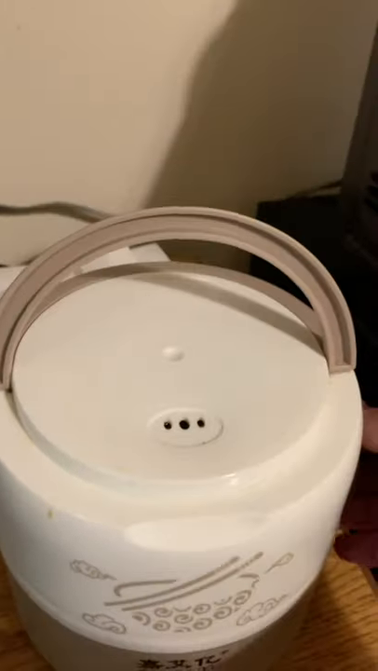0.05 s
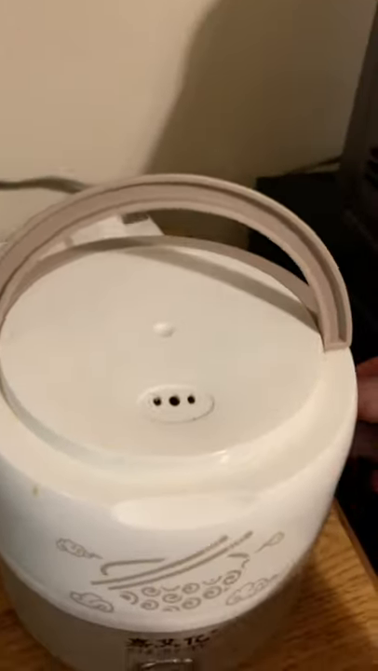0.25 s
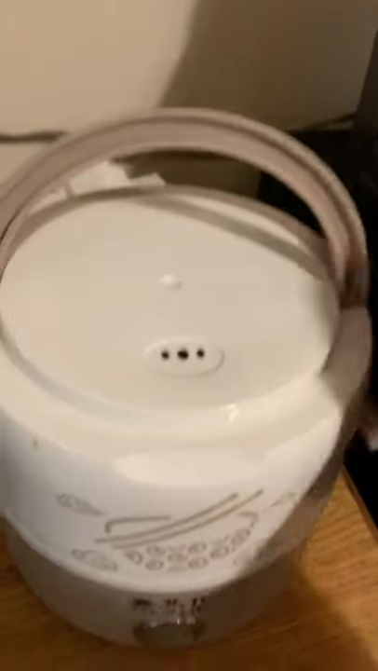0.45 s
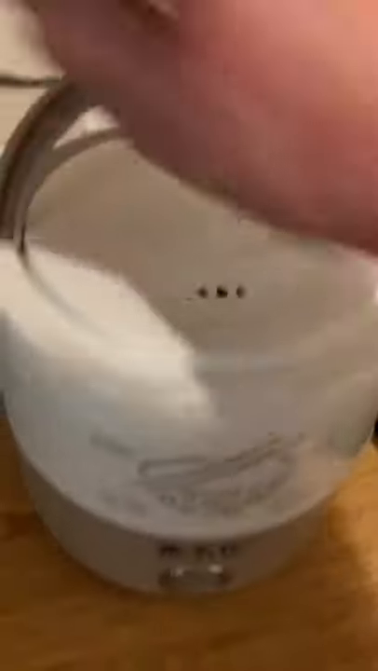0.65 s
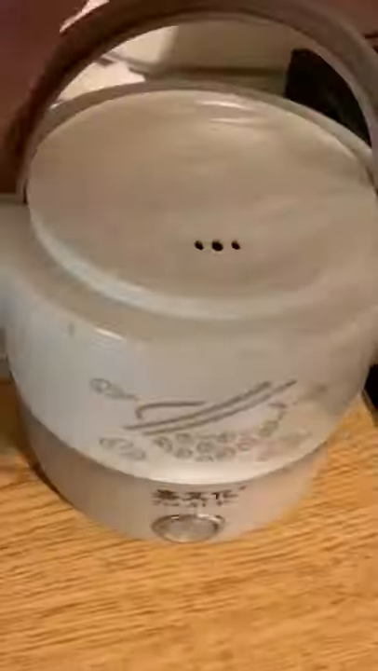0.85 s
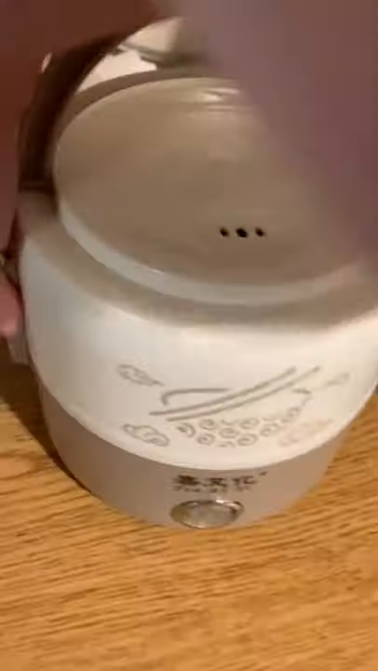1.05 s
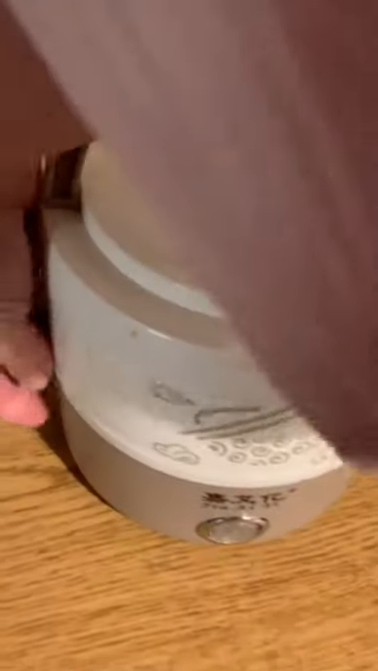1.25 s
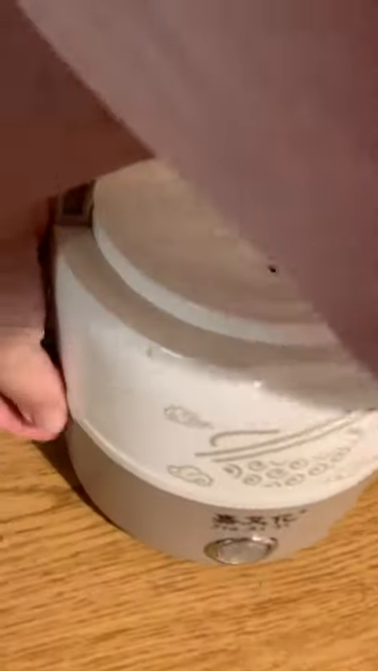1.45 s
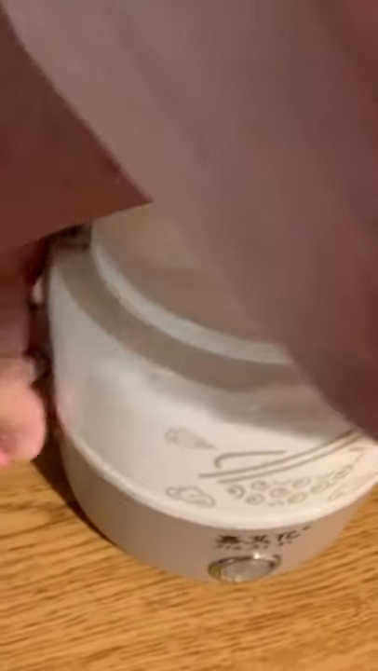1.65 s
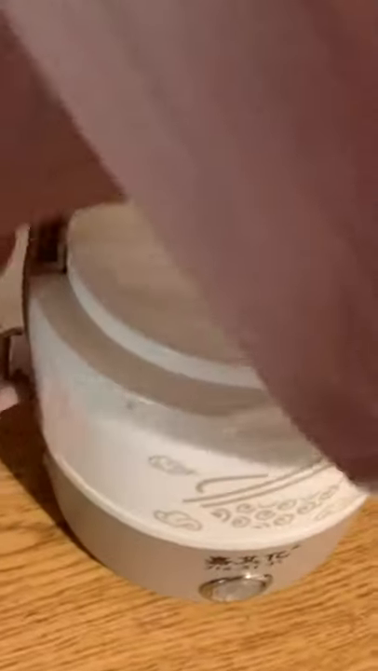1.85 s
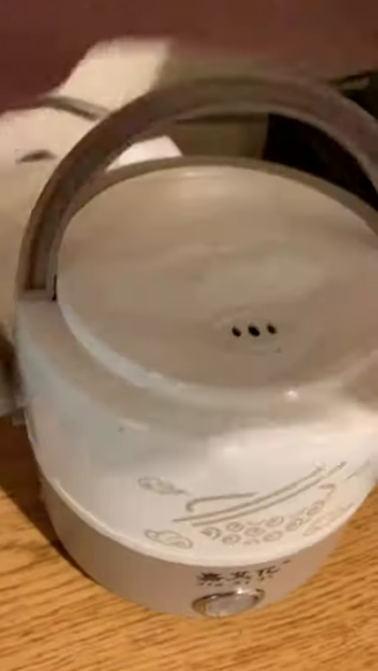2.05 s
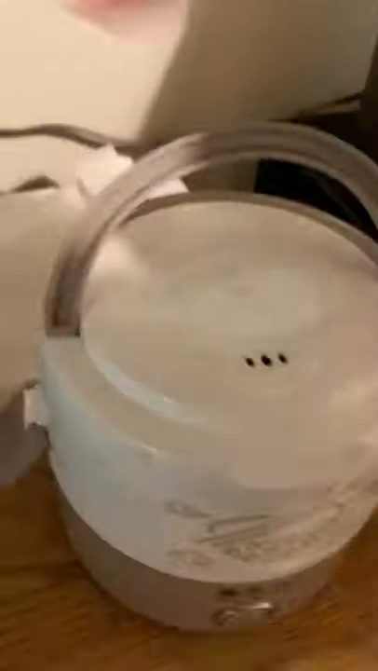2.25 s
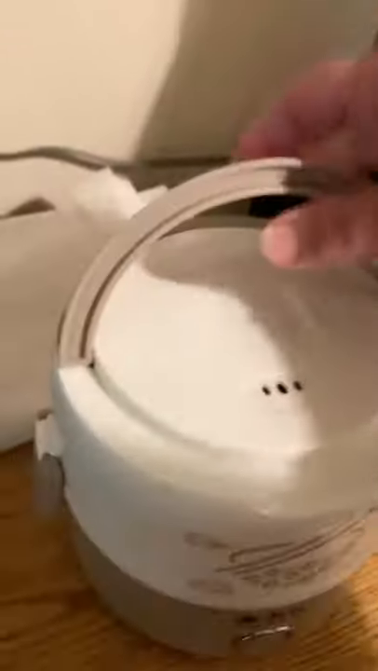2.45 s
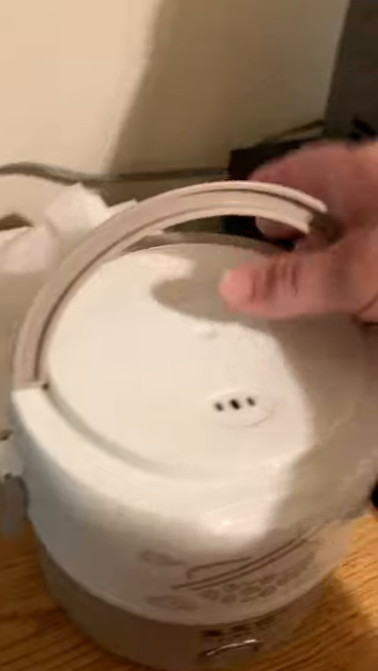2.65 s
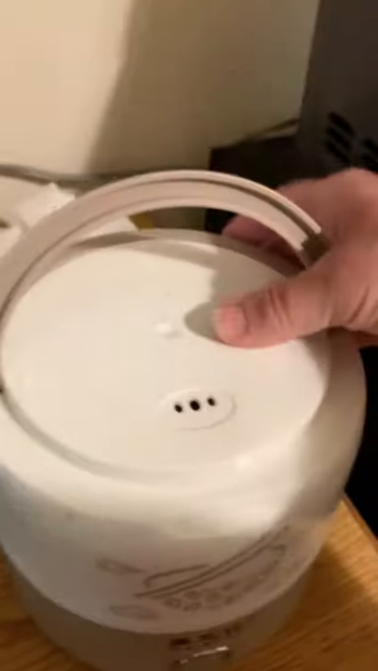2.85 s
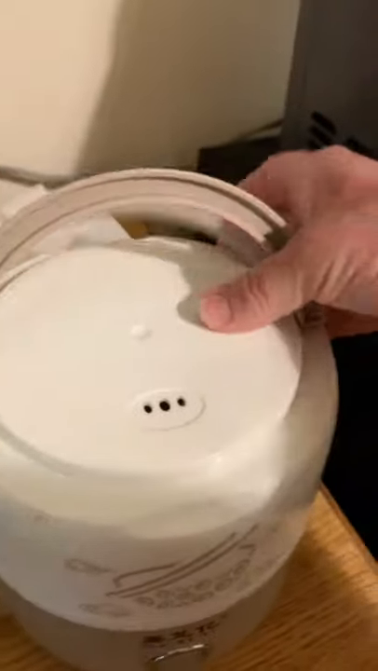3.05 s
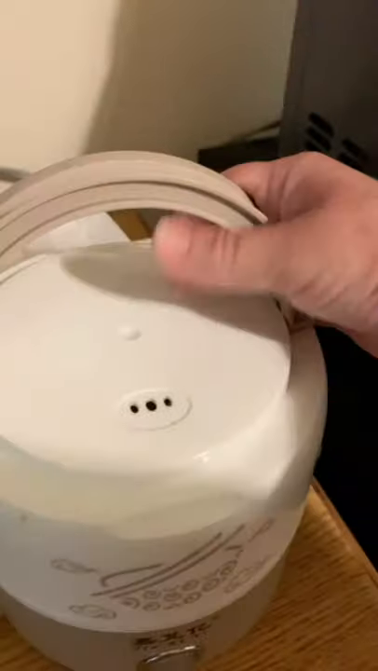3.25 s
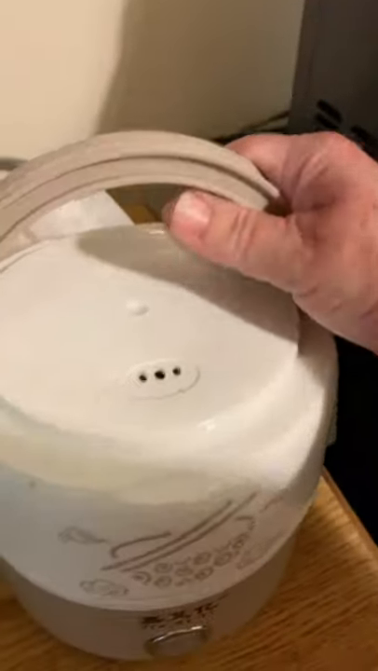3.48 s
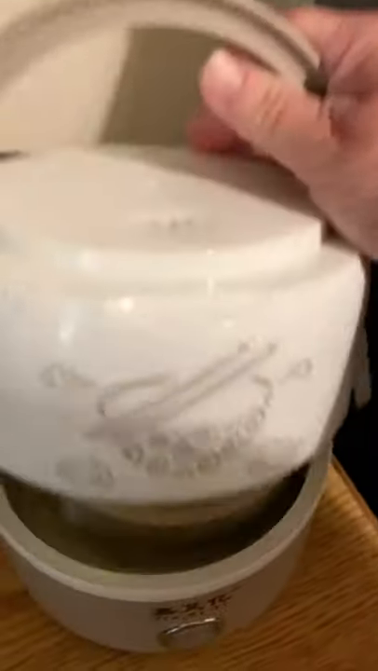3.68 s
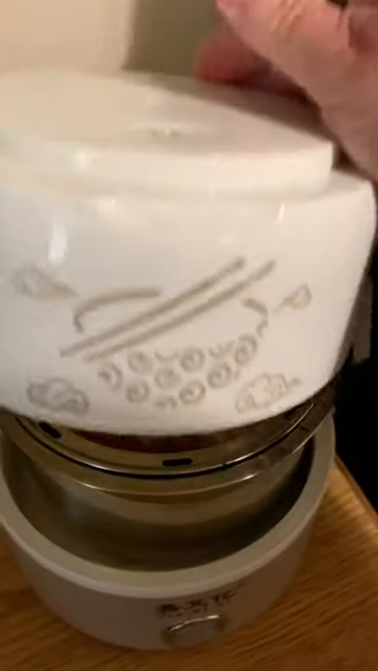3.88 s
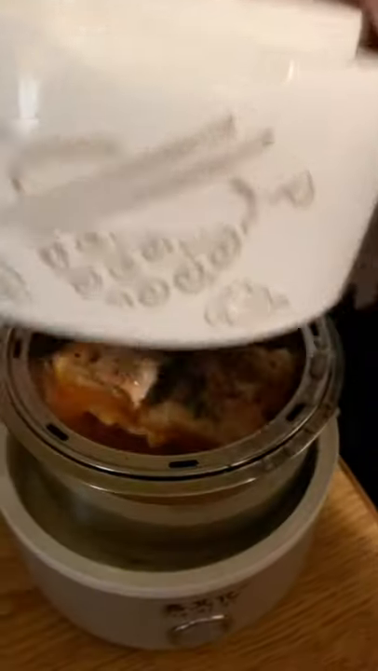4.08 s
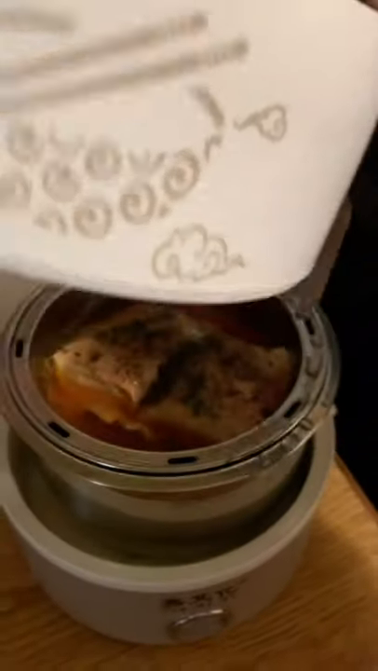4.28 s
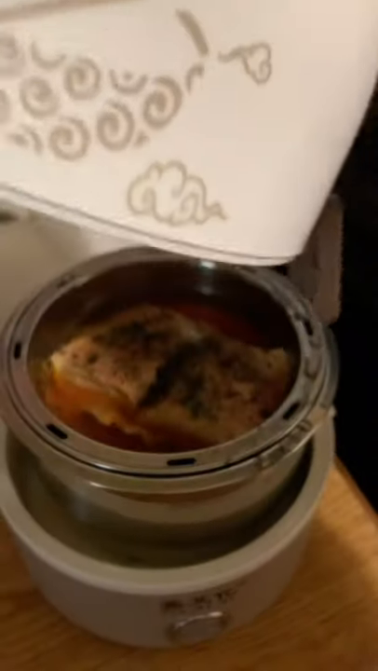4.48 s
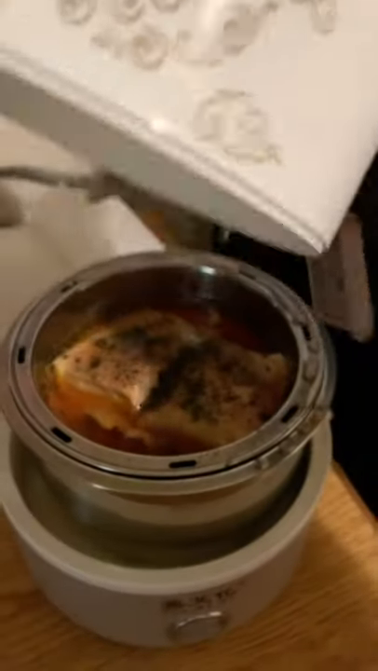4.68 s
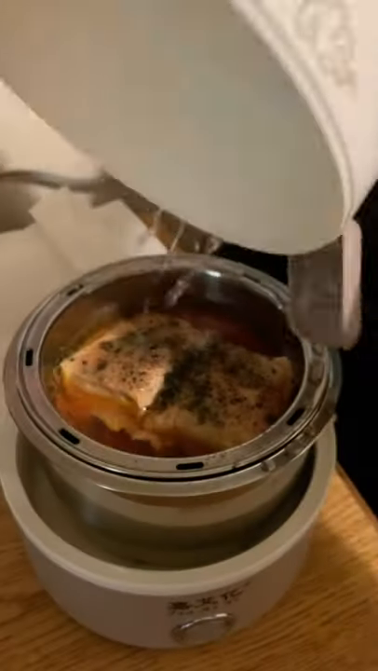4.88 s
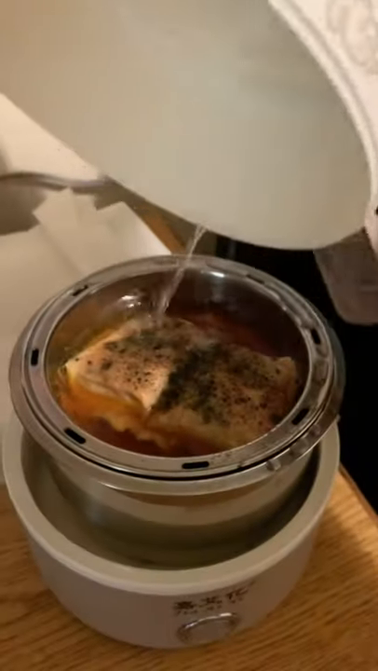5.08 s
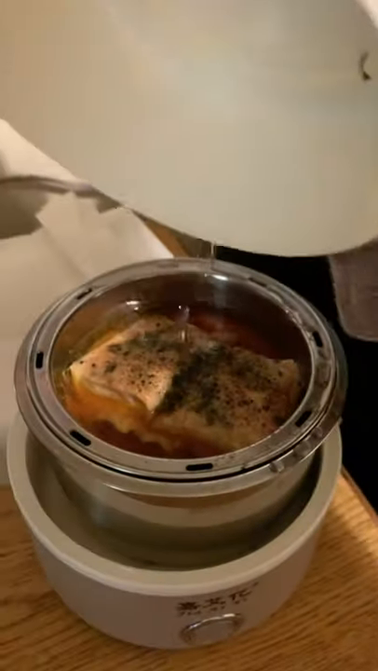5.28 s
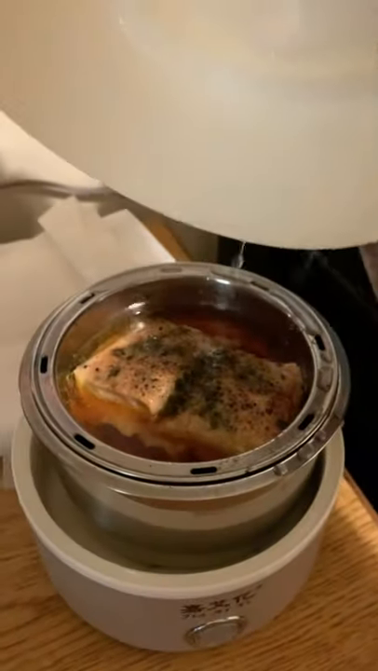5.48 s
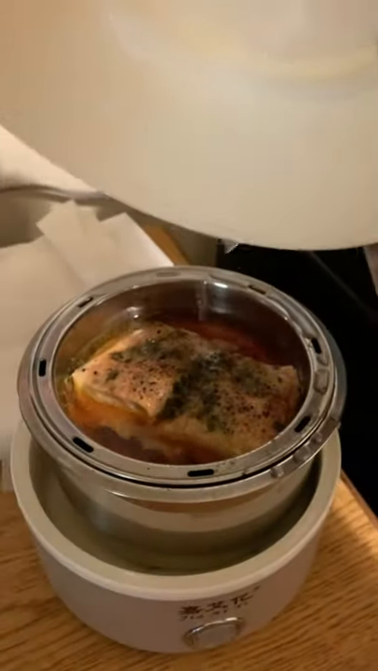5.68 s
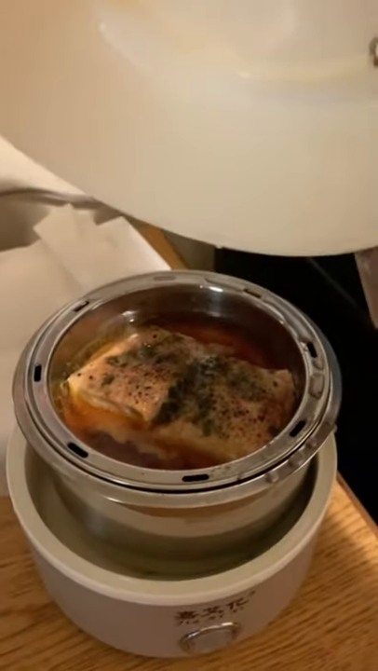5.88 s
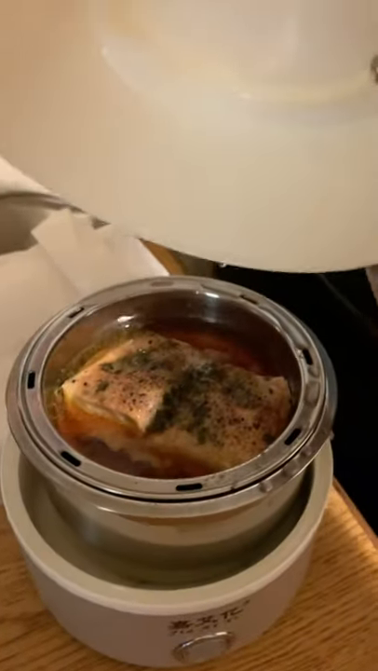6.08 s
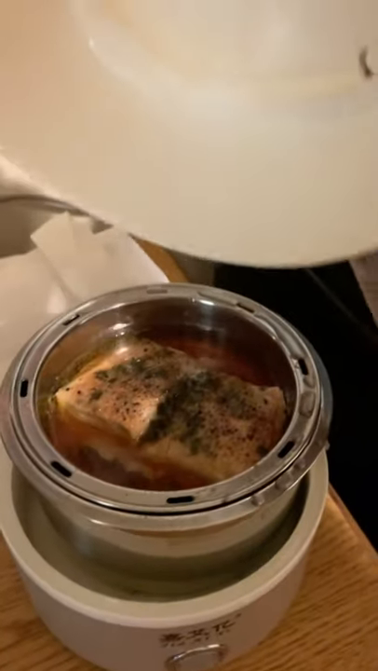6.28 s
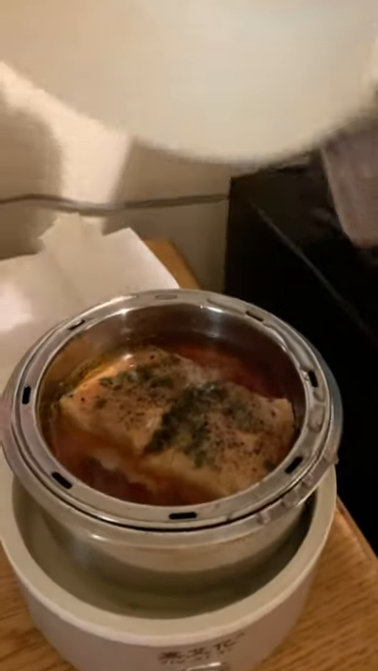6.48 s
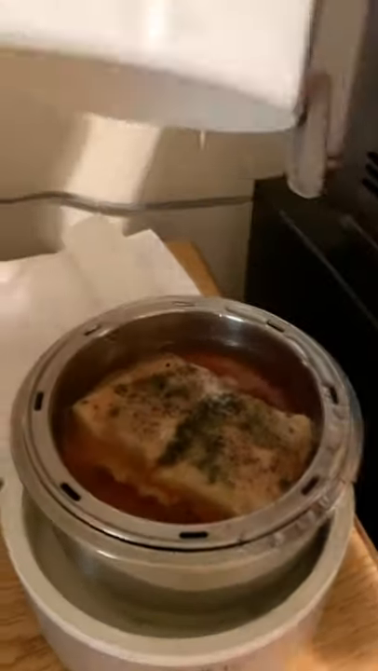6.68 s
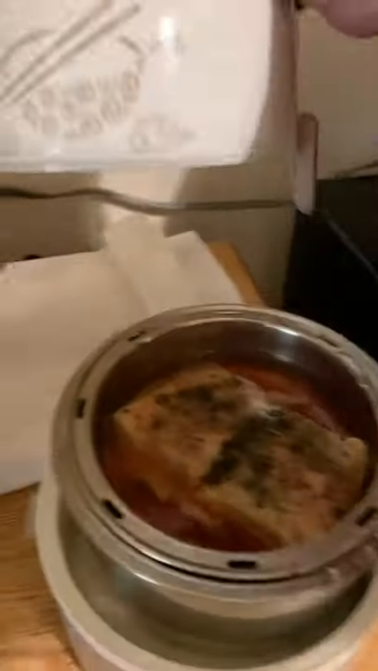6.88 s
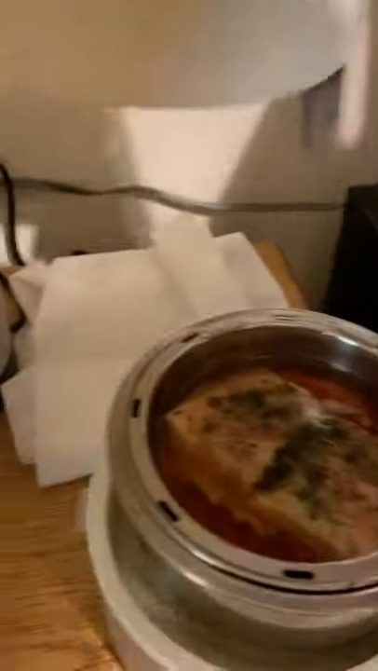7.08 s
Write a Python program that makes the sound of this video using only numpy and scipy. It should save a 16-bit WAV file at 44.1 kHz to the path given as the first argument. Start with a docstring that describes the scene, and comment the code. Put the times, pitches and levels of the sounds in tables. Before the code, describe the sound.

Close, dry clicks and knocks of a plastic container being unlatched, a brief rough scrape against steel, then irregular water drops pattering beside it.

```python
"""An electric lunch box is opened on a wooden desk in a small room, close to the microphone.
Handle, latches, cover and pot are struck or rubbed resonances; latches snap, the cover scrapes up off the pot.
Condensed water spatters beside it: each drop strikes modes, rings bubbles and makes a hollow hum.
Shaped noise gives the pot's steam, the brushing sleeve, the low rumble and the room air."""
import sys
import numpy as np
from scipy import signal
from scipy.fft import rfft, irfft
from scipy.io import wavfile
from scipy.ndimage import uniform_filter1d

SR = 44100
rng = np.random.default_rng(int(sys.argv[2]) if len(sys.argv) > 2 else 0)


def store_wav(level_fs):
    """Save 16-bit WAV to argv[1]."""
    pcm = np.round(np.clip(np.atleast_2d(level_fs), -1, 1) * 32767)
    wavfile.write(sys.argv[1], SR, pcm.T.astype(np.int16))


N = 314433


def amp(db):
    """Decibels to gain."""
    return 10 ** (np.asarray(db) / 20)


def evened(x):
    """Scales to rms 1."""
    return x / np.sqrt(np.mean(x ** 2) + 1e-20)


def read(points, hz):
    """Interpolates a table along a log-frequency axis."""
    f, value = np.transpose(points)
    return np.interp(np.log(hz + 1), np.log(f + 1), value)


def add(mix, s, sound):
    """Mixes a sound in at time s."""
    part = mix[max(round(s * SR), 0):][:len(sound)]
    part += sound[:len(part)]


def body(modes, hz, loss):
    """Response of resonances of alternating sign; loss widens each in proportion to its pitch."""
    total = 0
    for k, (f, width_hz, db) in enumerate(modes):
        damping = 1j * hz * (width_hz + loss * f)
        total = total + (-1) ** k * amp(db) * damping / (f * f - hz * hz + damping)
    return total


def bending(hz, lag_s):
    """Bending waves in a thin shell: treble arrives first, bass late (about lag_s at 1 kHz)."""
    delay_s = lag_s * (1000 / (hz + 60)) ** 0.774
    return np.exp(-2j * np.pi * np.cumsum(delay_s) * hz[1])


def swells(rows, swell_db=20):
    """Gain of efforts that build by swell_db in rise_s and lose it again in fall_s."""
    t = np.arange(N) / SR
    gain = np.zeros(N)
    for peak_s, db, rise_s, fall_s in rows:
        distance = np.maximum((peak_s - t) / rise_s, (t - peak_s) / fall_s)
        gain += amp(db - swell_db * distance)
    return gain


def scattered(spells, count, spread_db):
    """Small events strewn unevenly through each spell, count to a spell: start_s, level_db."""
    events = []
    for start_s, end_s, db in spells:
        for k, (late, size) in enumerate(rng.random((count, 2))):
            s = start_s + (end_s - start_s) * (k + late) / count
            events.append((s, db + spread_db * (size - .5)))
    return events


# diffuse sound at the two ports: hz, likeness (-1 to 1)
LIKENESS = [(60, 0.96), (130, 0.93), (290, 0.86), (640, 0.21), (1410, 0.71), (3100, -0.54), (6820, 0.68),
            (15000, -0.42)]
# close sound, right port behind left: hz, lag_rad
PORT_PHASE = [(0, -0.5), (1100, 0.6), (2000, 1.13), (3500, 1.63), (5000, 3.5), (6500, 5), (8000, 7.5),
              (9800, 9), (11800, 14), (16000, 12.5)]


def noise(colour, patchy_db, direct=0):
    """Two-channel coloured noise with drifting patches; share direct comes from close by, the rest is diffuse."""
    hz = np.fft.rfftfreq(2048, 1 / SR)
    a, b, c, d, patches = rng.standard_normal((5, N // 512 + 5, len(hz))).transpose(0, 2, 1)
    patches = uniform_filter1d(patches, size=20, axis=0)
    patches = evened(uniform_filter1d(patches, size=6, axis=1))
    direct = np.clip(direct, 0, 1)
    diffuse_same = np.clip(read(LIKENESS, hz), -1, 1)
    direct_same = np.exp(-1j * read(PORT_PHASE, hz))
    same = ((1 - direct) * diffuse_same + direct * direct_same)[:, None]
    left = a + 1j * b
    right = same * left + np.sqrt(abs(1 - abs(same) ** 2)) * (c + 1j * d)
    z = np.array([left, right]) * amp(read(colour, hz)[:, None] + patchy_db * patches)
    return evened(signal.istft(z, nperseg=2048, noverlap=1536)[1][:, :N])


# spectrum shape: hz, relative_db_per_hz
ROOM_AIR = [(150, -52), (250, -12), (698, -7), (1580, -23), (2620, -26.5), (8260, -36), (9830, -76),
            (10700, -33), (12100, -38), (16000, -57)]


def room_air():
    """Steady diffuse noise of the room."""
    return amp(-58.0) * noise(ROOM_AIR, patchy_db=3.5)


# spectrum shape: hz, relative_db_per_hz
RUMBLE_COLOUR = [(15, -38), (25, -16.5), (65, 1), (97, -13.5), (123, 3), (152, -12.5), (179, -5),
                 (224, -13), (248, -6), (335, -9), (370, -18), (394, -17), (500, -20.5), (650, -49),
                 (1100, -120)]


def low_rumble():
    """Low diffuse noise of handling and of the room."""
    return amp(-49) * noise(RUMBLE_COLOUR, patchy_db=2.5)


# close sound into the microphone: hz, level_db
MIC = [(100, 2.5), (1000, -2.5), (3000, -2.5), (5000, 9), (7500, 0.5), (8700, 0), (9900, -10.5),
       (11500, -6.5), (13300, -9.5), (15500, -37)]


def microphone_spectrum(x):
    """Spectrum of x with the microphone's colour."""
    return rfft(x) * amp(read(MIC, np.fft.rfftfreq(N, 1 / SR)))


def ports(x, balance):
    """A close source reaches the two microphone ports with different delay and level."""
    hz = np.fft.rfftfreq(N, 1 / SR)
    z = microphone_spectrum(x)
    side = amp(read(balance, hz) / 2)
    return irfft(np.array([z * side, z / side * np.exp(-1j * read(PORT_PHASE, hz))]), N)


def all_around(x, evening):
    """A shell beams each mode its own way, so its total radiation has a smoother spectrum (evening 0-1)."""
    z = rfft(x)
    fine_db = 10 * np.log10(abs(uniform_filter1d(abs(z) ** 2, size=250)) + 1e-12)
    peaks_db = fine_db - uniform_filter1d(fine_db, size=9000)
    return irfft(z * amp(-np.clip(evening, 0, 1) * peaks_db), N)


# decay per band: hz, t60_s
ROOM_T60 = [(120, 1.5), (400, 0.5), (1500, 0.36), (4000, 0.53), (8000, 0.37), (14000, 0.36)]
# echo spectrum shape: hz, relative_db
ROOM_COLOUR = [(100, 7), (300, 7.5), (1000, 10.5), (3000, 5), (7000, -4.5), (13000, 10.5)]


def room(x, gap_s):
    """Dense reflections from desk and walls; each band dies at its own speed, the bass nearly alike on both sides."""
    taps = rng.standard_normal((2, SR // 2)) * (rng.random((2, SR // 2)) < .1)
    hz, t, z = signal.stft(taps, SR, nperseg=256)
    same = np.clip(read(LIKENESS, hz), -1, 1)[:, None]
    z = np.array([z[0], same * z[0] + np.sqrt(1 - same ** 2) * z[1]])
    z = z * amp(-60 * t / read(ROOM_T60, hz)[:, None])
    tail = signal.istft(z * amp(read(ROOM_COLOUR, hz))[:, None], SR, nperseg=256)[1]
    # silent for gap_s, then faded in over gap_s
    tail = tail * np.clip(np.arange(tail.shape[1]) / SR / gap_s - 1, 0, 1)
    heard = irfft(microphone_spectrum(x), N)
    return signal.fftconvolve(heard[None], tail / np.linalg.norm(tail[0]), axes=1)[:, :N]


# spectrum shape: hz, relative_db_per_hz
STEAM_COLOUR = [(290, -40), (500, -4), (1020, -21), (1190, -1), (1300, -8.5), (1870, 1.5), (2570, -6.5),
                (3250, -20), (4090, -5.5), (6510, -3.5), (8830, -19.5), (9360, -65), (10800, -20),
                (13300, -19.5), (16000, -68)]
STEAM_START_S, STEAM_RISE_S, STEAM_DB, STEAM_FADE_DB_PER_S = 3.55, 0.016, -54.5, 2.5


def steam_hiss():
    """Steam freed as the cover lifts: noise with a quick rise, then a steady fade."""
    age_s = np.maximum(np.arange(N) / SR - STEAM_START_S, 0)
    gain = np.minimum(age_s / STEAM_RISE_S, 1) * amp(STEAM_DB - STEAM_FADE_DB_PER_S * age_s)
    return gain * noise(STEAM_COLOUR, patchy_db=2.0, direct=0.81)


def strokes(rows, edge_db=16.5):
    """Gain of smooth strokes, loudest in the middle and edge_db softer at the ends."""
    t = np.arange(N) / SR
    return sum(amp(db - edge_db * (2 * (t - s) / length_s) ** 2) for s, length_s, db in rows)


# sleeve and hand strokes: middle_s, length_s, level_db, fizz_db (re level)
BRUSH = [(0.148, 0.081, -59.5, -4), (0.3, 0.1, -68.5, -2), (0.983, .13, -60.5, 5), (1.178, 0.21, -65.5, 2),
         (1.273, 0.24, -61.5, -4.5), (1.508, 0.18, -62.5, -1), (2.502, 0.12, -73, 8),
         (2.695, 0.12, -53, -8.5), (2.86, 0.15, -62, -4), (3.06, 0.038, -63.5, 9), (3.16, 0.23, -83, 16)]
# soft part, spectrum shape: hz, relative_db_per_hz
BRUSH_COLOUR = [(600, 1), (1800, 3.5), (3800, -0.5), (5000, -3.5), (7300, -3), (9300, -33), (15500, -43.5)]
# bright part, spectrum shape: hz, relative_db_per_hz
BRUSH_FIZZ = [(2500, -7), (5000, 0.5), (7200, -2), (8700, -0.5), (9800, -26), (11000, -2), (12200, 1),
              (13500, -2), (14800, -34)]


def brushing(flutter_db):
    """Cloth and skin swish past: soft body and bright fizz flutter together as the weave catches."""
    soft_gain = strokes([row[:3] for row in BRUSH])
    fizz_gain = strokes([(s, length_s, db + fizz_db) for s, length_s, db, fizz_db in BRUSH])
    soft = soft_gain * noise(BRUSH_COLOUR, patchy_db=1.5, direct=0.73)
    fizz = fizz_gain * noise(BRUSH_FIZZ, patchy_db=0.5, direct=1.0)
    flutter = evened(uniform_filter1d(rng.standard_normal(N), size=400))
    return (soft + fizz) * amp(flutter_db * flutter)


# the crack changes by CRACK_PER_DB for each dB above HEAVY_DB and trails off in a buzz
HEAVY_DB, CRACK_PER_DB, BUZZ_DB, BUZZ_S = -19, -0.4, -26.5, 0.043


def blows(rows, modes, gain_db, loss, focus_db, crack_db, crack_s, chatter, chatter_s, lag_s,
          focus_width=0.13):
    """A push plus brief contact chatter rings the modes and a crack of dense, fast-dying ones."""
    t = np.arange(8192) / SR
    hz, out = np.fft.rfftfreq(len(t), 1 / SR), np.zeros(N)
    bands = [(hz > lo) & (hz < hi) for lo, hi in [(80, 600), (600, 3500), (3500, 15000)]]
    lead_s = .002
    ring = body(modes, hz, loss)
    spread = bending(hz, lag_s) * np.exp(-2j * np.pi * hz * lead_s)
    chatter_decay = np.exp(-t / chatter_s)
    crack_decay = np.exp(-t / crack_s) + amp(BUZZ_DB) * np.exp(-t / BUZZ_S)
    for s, db, bass_db, treble_db, ring_hz in rows:
        grit, dense = rng.standard_normal((2, len(t))) * [chatter_decay, crack_decay]
        push = 1 + chatter * evened(rfft(grit)) * hz / (hz + 900)
        crack_gain = amp(crack_db + CRACK_PER_DB * max(db - HEAVY_DB, 0))
        crack = crack_gain * evened(rfft(dense)) * hz / (hz + 700)
        z = (push * ring + crack) * spread
        # contact place weights one range of modes
        z = z * (0.5 + body([(ring_hz, 0, focus_db)], hz, loss=focus_width))
        # contact hardness sets the shares of bass, middle and treble
        band_db = 20 * np.log10([np.linalg.norm(z[band]) / len(t) for band in bands])
        low, mid, high = np.array([db + bass_db, db, db + treble_db]) - band_db
        tone_db = read([(450, low), (800, mid), (2600, mid), (4800, high)], hz)
        add(out, s - lead_s, irfft(z * amp(tone_db)))
    return amp(gain_db) * out


# drops beside the pot: start_s, level_db (before gain), treble_db (re level), ring_hz
DROPS = [(4.35, -31.5, -13.5, 1690), (4.371, -38, -23, 1120), (4.438, -25, -13.5, 1820),
         (4.463, -32.5, -22, 860), (4.493, -22.5, -21, 1780), (4.53, -18, -12.5, 2050),
         (4.543, -26.5, -18, 2650), (4.562, -32, -19, 1500), (4.584, -36, -14, 1840),
         (4.604, -20, -14.5, 2480), (4.65, -33.5, -13, 1410), (4.708, -25, -15, 2560),
         (4.738, -25.5, -16, 1590), (4.748, -23, -13, 1170), (4.757, -34, -14, 1890),
         (4.817, -38.5, -8, 800), (4.83, -29.5, -19, 1630), (4.879, -26, -21, 1580),
         (4.885, -24, -11, 1630), (4.966, -26.5, -15.5, 1035), (5.025, -32, -24, 794),
         (5.055, -33, -27, 770), (5.073, -33.5, -12, 1650), (5.192, -23, -16, 1570),
         (5.221, -31, -15, 1510), (5.23, -20.5, -13, 1160), (5.359, -23, -14, 1670),
         (5.392, -32, -12, 1600), (5.401, -20.5, -9, 2060), (5.532, -25, -16, 1630),
         (5.555, -36, -20, 1310), (5.565, -20, -6.5, 1490), (5.647, -26, -10.5, 1670),
         (5.657, -22.5, -19, 1600), (5.709, -33.5, -29, 770), (5.736, -31.5, -12.5, 1780),
         (5.752, -36.5, -16, 1540), (5.827, -38, -34, 795), (5.904, -29.5, -21, 790),
         (5.963, -44.5, -25, 777), (6.001, -39, -26, 810), (6.025, -24, -18.5, 825),
         (6.045, -21, -9.5, 2020), (6.084, -26, -16.5, 1630), (6.126, -22.5, -16, 1950),
         (6.155, -20.5, -9, 843), (6.582, -33.5, -16.5, 1100), (6.728, -44, -36, 1160),
         (6.742, -39.5, -28, 1150), (6.814, -36.5, -22.5, 1940), (6.903, -33, -17, 1190),
         (6.946, -40.5, -15, 1140), (6.968, -39, -23, 1100), (6.99, -37, -4, 1180),
         (7.056, -38.5, -20, 1960), (7.09, -29, -20, 830), (7.101, -31.5, -17, 1130)]
# spells of small drips: start_s, end_s, level_db (before gain)
DRIPPING = [(4.42, 5.08, -38.5), (5.15, 6.15, -41), (6.55, 7.12, -41.5)]
# landing gains body as the cover tilts: time_s, bass_db (re level)
SPLASH_BASS = [(4.45, -29), (4.9, -12.5), (5.35, -13.5), (5.6, -9), (6.15, -11.5), (6.6, -10)]
# leaders run LEADER_S/2 to LEADER_S ahead of a big drop
LEADER_S, LEADER_DB, LEADER_SPREAD_DB = 0.012, -6, 22


def landings(drip_treble_db, drip_hz, vary_db, vary_octaves):
    """Rows for blows(): big drops, lighter leaders and random drips; the bass follows the tilt."""
    leaders = []
    for (s, db, treble_db, hz), (early, light) in zip(DROPS, rng.random((len(DROPS), 2))):
        leader_s = s - LEADER_S * (1 + early) / 2
        leaders.append((leader_s, db + LEADER_DB - LEADER_SPREAD_DB * light, treble_db, hz))
    drips = [(s, db, drip_treble_db, drip_hz * 2 ** (vary_octaves * rng.uniform(-0.66, 1)))
             for s, db in scattered(DRIPPING, count=8, spread_db=10)]
    s, db, treble_db, ring_hz = np.transpose(DROPS + leaders + drips)
    bass_db = np.interp(s, *np.transpose(SPLASH_BASS)) + vary_db * rng.standard_normal(len(s))
    return list(zip(s, db, bass_db, treble_db, ring_hz))


def spray(falls, count, delay_s, quieter_db, spread_db, treble_db):
    """Rows for blows(): each drop throws fine, bright droplets that land a moment later."""
    s, db = np.repeat(falls, count, axis=0).T[:2]
    flight, size, place = rng.random((len(s), 3)).T
    land_s = s + 0.0061 + delay_s * flight ** 2
    level_db = db - quieter_db - spread_db * size
    ring_hz = 1100 + 1800 * place
    return [(when, loud, -20, treble_db, hz) for when, loud, hz in zip(land_s, level_db, ring_hz)]


def hollow(falls, hum_hz, t60_s, gain_db, follow):
    """Air in the hollow under the water hums after each drop, louder after a big, full one."""
    t, out = np.arange(SR // 4) / SR, np.zeros(N)
    decay = np.exp(-np.log(1000) * t / t60_s)
    hum = np.sin(2 * np.pi * hum_hz * t) * decay * (1 - np.exp(-t / 0.00052))
    for s, db, bass_db, *_ in falls:
        add(out, s, amp(gain_db + db + follow * bass_db) * hum)
    return out


def bubble(hz, cycles, glide=0.0257):
    """A trapped bubble: a decaying sine that rises slightly in pitch."""
    turns = np.arange(0, 6 * cycles, hz / SR)
    age = turns / cycles
    return np.sin(2 * np.pi * turns * (1 + glide * age)) * np.exp(-age) * (1 - np.exp(-turns))


def plops(gain_db, second_db, second_hz, tiny_db, tiny_hz, late_s):
    """Each drop traps a bubble at its own pitch, a second of chance size and three tiny pinging ones."""
    out = np.zeros(N)
    for (s, db, treble_db, hz), (late, size, *tiny) in zip(DROPS, rng.random((len(DROPS), 8))):
        add(out, s + 0.00192, amp(db + gain_db) * bubble(hz, cycles=5.7))
        second = bubble(second_hz * 3.0 ** (size ** 2), cycles=4.4)
        add(out, s + late_s * late, amp(db + second_db) * second)
        for delay, bulk in zip(tiny[::2], tiny[1::2]):
            ping = bubble(tiny_hz / 2 ** (bulk ** 2), cycles=17.4)
            add(out, s + late_s * delay ** 2, amp(db + treble_db + tiny_db) * ping)
    return out


# resonances where the water lands: mode_hz, width_hz (before loss), level_db
SPLASH_PAN = [(317.6, 12.2, 25), (803, 90, -3), (1000, 86, -3), (1906, 420, -9.5), (2586, 49, -9),
              (3350, 57, -22), (4240, 750, -6), (5720, 88, -3), (6600, 1900, -11), (8200, 59, -41)]


def falling_water():
    """Drops and spray strike the landing's modes; hollow air and bubbles ring with the drops."""
    falls = landings(drip_treble_db=-30, drip_hz=1310, vary_db=-1.0, vary_octaves=0.37)
    drops = blows(falls, SPLASH_PAN, gain_db=-23.5, loss=0.015, focus_db=-1, crack_db=-21, crack_s=0.0058,
                  chatter=0.78, chatter_s=0.0052, lag_s=0.001232, focus_width=0.095)
    fine = spray(DROPS, count=4, delay_s=0.049, quieter_db=16, spread_db=25, treble_db=-11.0)
    droplets = blows(fine, SPLASH_PAN, gain_db=-21, loss=0.09, focus_db=1, crack_db=-18, crack_s=0.0043,
                     chatter=0.15, chatter_s=0.0011, lag_s=0.00057)
    hum = hollow(falls, hum_hz=342.0, t60_s=0.13, gain_db=-4.0, follow=0.67)
    bubbles = plops(gain_db=-8.5, second_db=-12.5, second_hz=757, tiny_db=0.0, tiny_hz=13060, late_s=0.011)
    return drops + droplets + hum + bubbles


# resonances: mode_hz, width_hz (before loss), level_db
BOX_ON_DESK = [(70, 30, -6), (124, 40, 6), (191.6, 52, 7), (314, 32, 2), (459, 19, -1)]
# fingers bump the box and it rocks: start_s, level_db (before gain)
BUMPS = [(0.306, -27), (0.419, -26), (0.968, -36.5), (1.367, -31.5), (1.568, -13.5), (1.657, -27),
         (2.194, -22.5), (3.078, -24), (3.253, -34), (3.321, -31.5), (3.389, -34.5), (3.445, -39)]


def bumps(gain_db, soft_hz, lag_s):
    """Soft pushes that wake only the lowest modes of the box on the desk."""
    hz, out = np.fft.rfftfreq(8192, 1 / SR), np.zeros(N)
    push = 1 / (1 + 1j * hz / soft_hz) ** 2
    thud = irfft(body(BOX_ON_DESK, hz, loss=0.01) * bending(hz, lag_s) * push)
    for s, db in BUMPS:
        add(out, s, amp(db + gain_db) * thud / abs(thud).max())
    return out


# box dragged along the desk: peak_s, level_db, rise_s, fall_s
DRAG = [(2.22, -49, 0.018, 0.55), (3.46, -39, 0.12, 0.096), (3.585, -55, 0.032, 0.086)]


def judder(slips_per_s, spread_db, loss):
    """The foot sticks and slips on the desk; each slip softly pushes the box's lowest modes."""
    size = amp(spread_db * rng.random(N))
    slips = (rng.random(N) < slips_per_s / SR) * size * rng.choice([-1, 1], N)
    hz = np.fft.rfftfreq(N, 1 / SR)
    colour = body(BOX_ON_DESK, hz, loss) * hz / (hz + 200)
    return swells(DRAG) * evened(irfft(rfft(slips) * colour, N))


def rub(strength, modes, gain_db, loss, spread_db, hiss_db, low_hz, slips_per_s=1400):
    """Friction: tiny slips of uneven size, dense enough to merge into one rough sound, ring the modes."""
    size = amp(spread_db * np.minimum(rng.exponential(1, N), 4))
    slips = (rng.random(N) < slips_per_s / SR) * rng.choice([-1, 1], N) * size
    hz = np.fft.rfftfreq(N, 1 / SR)
    colour = (body(modes, hz, loss) + amp(hiss_db)) * hz ** 2 / (hz ** 2 + low_hz ** 2)
    return amp(gain_db) * strength * evened(irfft(rfft(slips) * colour, N))


# steel pot resonances: mode_hz, width_hz (before loss), level_db
POT = [(317, 17, 12), (443, 55, 6.5), (1116, 64, 4), (1600, 190, -3), (1980, 86, 4), (2570, 48, 3.5),
       (3000, 120, -4.5), (4090, 54, 2.5), (4470, 50, -1), (5840, 72, -23), (6380, 34, -9), (8150, 91, -14)]
# cover slides up the pot: peak_s, level_db (before gain), rise_s, fall_s
SLIDE = [(3.59, -48, 0.1, 0.049), (3.67, -51.5, 0.12, 0.18), (3.778, -47, 0.09, 0.067)]


def cover_scrape():
    """The cover's rim slides up the pot; friction rings the steel."""
    return rub(swells(SLIDE), POT, gain_db=5.0, loss=0.008, spread_db=3.0, hiss_db=-20, low_hz=176.6)


# cover's rim catches: start_s, level_db (before gain), bass_db, treble_db (re level), ring_hz
RIM_CATCHES = [(3.569, -22, -2.5, -12.5, 1070), (3.582, -27, 2, -38, 1970), (3.595, -34, 3.5, -23, 1203),
               (3.607, -36, -4, -19, 1650), (3.662, -39.5, -18, -13, 2620), (3.712, -34, -7.5, -12, 1400),
               (3.735, -29, -14.5, -15, 2300), (3.899, -31, -20, -7, 2620)]


def rim_catches():
    """The cover's rim catches on the steel pot; each catch strikes the pot's modes."""
    return blows(RIM_CATCHES, POT, gain_db=-19, loss=0.012, focus_db=-5.0, crack_db=-11.5, crack_s=0.0075,
                 chatter=0.66, chatter_s=0.0056, lag_s=0.001133)


# plastic cover resonances: mode_hz, width_hz (before loss), level_db
COVER = [(166, 150, -11.5), (316.6, 24, 0.5), (472, 34, -4.5), (676, 220, -10.5), (1103, 87, -0.5),
         (1410, 200, -6), (1755, 71, -2.5), (2070, 31, -5.5), (2490, 50, -15.5), (3070, 300, -24.5),
         (3970, 140, -15.5), (5970, 62, -34), (7700, 300, -8.5), (12100, 600, -33)]
# fingers strain until the plastic gives: peak_s, level_db (before gain), rise_s, fall_s
GRIP = [(1.29, -48, 0.042, .04), (1.566, -37.5, 0.024, 0.18), (1.98, -55, 0.14, 0.024),
        (2.184, -28.5, 0.019, 0.0092), (3.07, -48, 0.091, 0.038), (3.55, -46.5, 0.24, 0.016)]


def finger_grip():
    """Fingers rub on the plastic; friction rings the cover's modes below 5 kHz."""
    low_modes = [mode for mode in COVER if mode[0] < 5000]
    return rub(swells(GRIP), low_modes, gain_db=-5.0, loss=0.035, spread_db=-3.0, hiss_db=-53, low_hz=1100)


# latches on the cover: start_s, level_db (before gain), bass_db, treble_db (re level), ring_hz
COVER_KNOCKS = [(0.05, -46.5, 13, -13, 1500), (0.072, -25, -2, -13.5, 1230), (1.5625, -14, 0.5, -14.5, 920),
                (1.5664, -22.5, -9, -5, 800), (1.57, -13, -11.5, -10, 2000), (1.672, -36, -10, -23, 2000),
                (1.68, -34, 2.5, -14.5, 1190), (1.766, -39, -4, -17, 1110), (1.824, -40.5, -4.5, -17, 1140),
                (2.1856, -11.5, -2, -7.5, 2670), (2.327, -19, -9, -9, 1450), (2.409, -32, -1, -17, 1120),
                (2.904, -49.5, 8.5, -25, 1185), (3.079, -36.5, 9, -38, 1170),
                (3.354, -34, -36, -11.5, 2800), (3.45, -41.5, 10, -25.5, 1900),
                (3.479, -20.5, -11, -18, 1920), (3.489, -24, -6.5, -15, 1150)]
# loose cover chatters faintly: start_s, end_s, level_db (before gain)
RATTLES = [(1.6, 1.72, -41), (1.92, 1.98, -46.5), (2.21, 2.3, -47.5), (3.58, 3.68, -51)]
# a knock louder than HEAVY_DB rebounds once
REBOUND_S, REBOUND_DB, REBOUND_TREBLE_DB = 0.013, -14, -12


def cover_contacts(bass_db, treble_db, ring_hz):
    """Rows for blows(): knocks on the cover, softer rebounds of the heavy ones, faint rattling."""
    rebounds = [(s + REBOUND_S, db + REBOUND_DB, bass_db, REBOUND_TREBLE_DB, hz)
                for s, db, _, _, hz in COVER_KNOCKS if db > HEAVY_DB]
    rattles = [(s, db, bass_db, treble_db, ring_hz)
               for s, db in scattered(RATTLES, count=4, spread_db=-12.0)]
    return COVER_KNOCKS + rebounds + rattles


def cover_knocks():
    """Latches and loose contacts strike the plastic cover's modes."""
    contacts = cover_contacts(bass_db=5.5, treble_db=-13.5, ring_hz=1590)
    return blows(contacts, COVER, gain_db=-20.5, loss=0.023, focus_db=4.5, crack_db=-19, crack_s=0.0039,
                 chatter=0.43, chatter_s=0.0034, lag_s=0.001043)


# handle resonances: mode_hz, width_hz (before loss), level_db
HANDLE = [(182, 19, 1.5), (313.6, 22, 2.5), (468, 26, 7), (1162, 47, 6.5), (1386, 170, -19),
          (1720, 30, -27), (2480, 53, -22), (3500, 120, -31), (5730, 32, -16), (6440, 90, -8)]
# handle in its pivots: start_s, level_db (before gain), bass_db, treble_db (re level)
HANDLE_KNOCKS = [(0.416, -16, -0.5, -11.5), (0.559, -21, -1.5, -17.5), (0.669, -31, 2, -17),
                 (0.741, -36.5, -0.5, -20), (0.781, -46.5, 4, -31), (3.027, -29, -6, -25.5),
                 (3.187, -23, -12, -9), (3.29, -34, -6, -15.5)]


def handle_rattle():
    """The loose handle knocks in its pivots; the favoured overtone climbs as the contact moves."""
    ring_hz = np.linspace(1650, 2650, len(HANDLE_KNOCKS))
    swings = [(*knock, hz) for knock, hz in zip(HANDLE_KNOCKS, ring_hz)]
    return blows(swings, HANDLE, gain_db=-22.5, loss=0.0093, focus_db=-1.5, crack_db=-17.0, crack_s=0.0049,
                 chatter=1.0, chatter_s=0.0034, lag_s=0.002156)


# latch resonances: mode_hz, width_hz (before loss), level_db
LATCH = [(234, 34, 5), (1700, 62, 9.5), (3940, 32, 12), (5600, 170, -12), (7250, 48, -1),
         (11600, 500, 18.5)]
# latch off its catch: start_s, level_db (before gain), bass_db, treble_db (re level), ring_hz
LATCH_SNAPS = [(2.0, -18, -11.5, 1.5, 1530)]


def latch_snap():
    """A latch springs off its catch and rings its own modes."""
    return blows(LATCH_SNAPS, LATCH, gain_db=-20.0, loss=0.043, focus_db=9.5, crack_db=-10.5, crack_s=0.0027,
                 chatter=0.3, chatter_s=0.0028, lag_s=0.001)


# box at the two ports: hz, left_minus_right_db
BOX_BALANCE = [(60, -4), (110, 0.5), (200, -3.5), (380, 0), (700, -2.5), (1290, -3.5), (2380, -2.5),
               (4400, -5.5), (8120, 2.5), (15000, -2.5)]
# water at the two ports: hz, left_minus_right_db
DROP_BALANCE = [(60, -14), (110, -7), (200, -10), (380, 1.5), (700, -5.5), (1290, -5), (2380, -5.5),
                (4400, 5.5), (8120, -1), (15000, 1)]


def scene():
    """The box and the falling water, their echo, and the soft noises around them."""
    water = falling_water()
    latch = latch_snap()
    box = handle_rattle() + cover_knocks() + rim_catches() + cover_scrape() + finger_grip()
    box = box + bumps(gain_db=-1.0, soft_hz=590, lag_s=0.00144)
    box = box + judder(slips_per_s=140, spread_db=8, loss=0.033)
    close = ports(box + latch, BOX_BALANCE) + ports(water, DROP_BALANCE)
    thrown = amp(-14.0) * all_around(box, evening=0.71) + amp(-13.0) * all_around(latch, evening=0.99)
    echo = room(thrown + amp(-15.5) * water, gap_s=0.002)
    noises = steam_hiss() + brushing(flutter_db=2.0) + low_rumble() + room_air()
    left_right_db = [[-.6], [.6]]
    return close + echo + noises * amp(left_right_db)


def record(dry):
    """The recorder cuts the deepest bass and limits the band."""
    highpass = signal.butter(8, 31, "highpass", fs=SR, output="sos")
    dry = signal.sosfilt(highpass, dry)
    lowpass = signal.firwin(511, 16300, window=("kaiser", 9), fs=SR)
    return signal.oaconvolve(dry, lowpass[None], "same")


dry = scene()
out = record(dry)
store_wav(out)
```